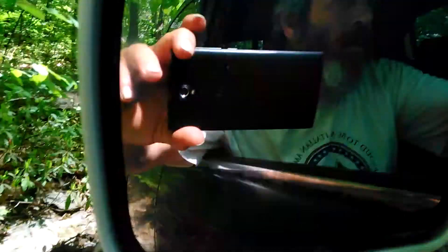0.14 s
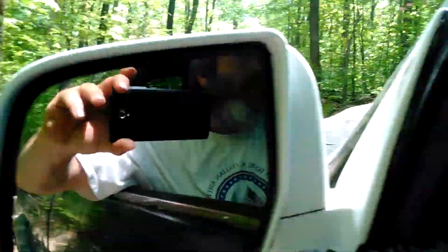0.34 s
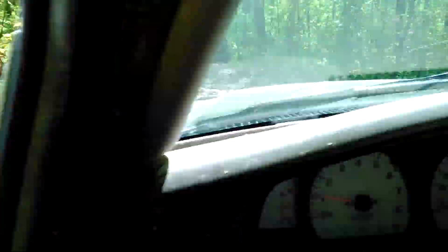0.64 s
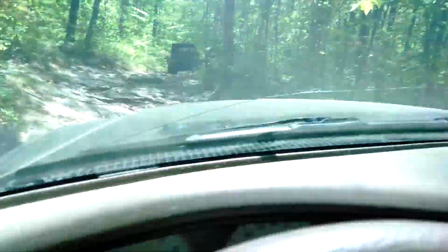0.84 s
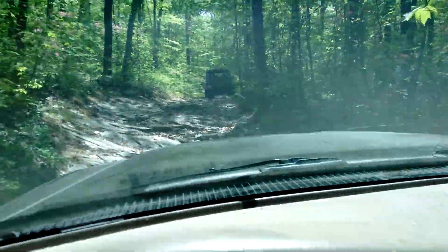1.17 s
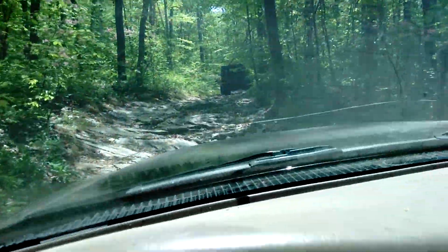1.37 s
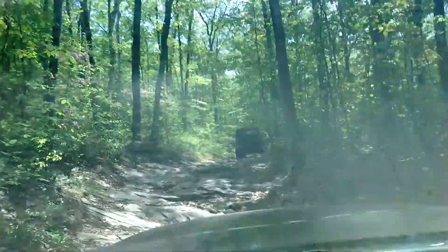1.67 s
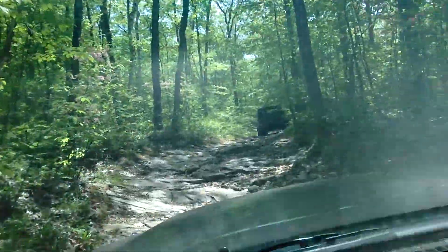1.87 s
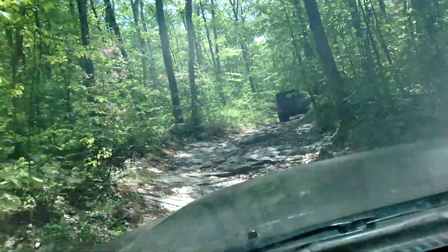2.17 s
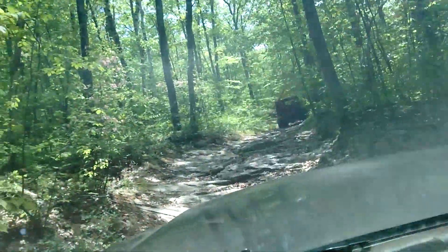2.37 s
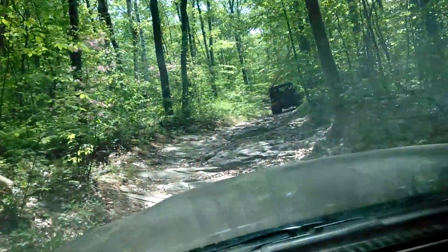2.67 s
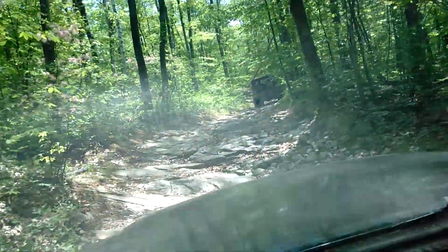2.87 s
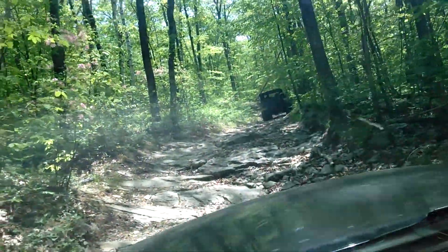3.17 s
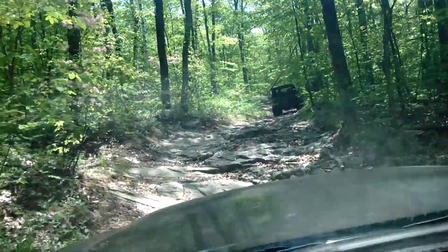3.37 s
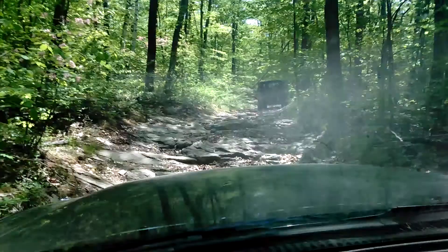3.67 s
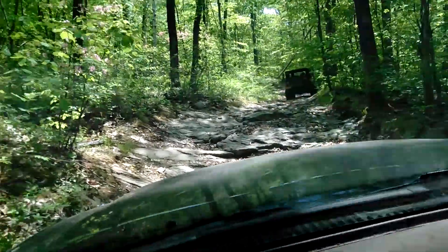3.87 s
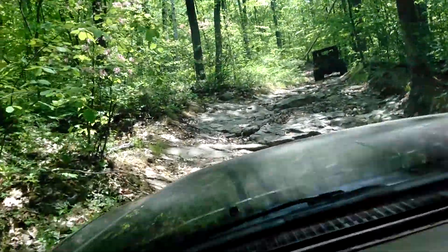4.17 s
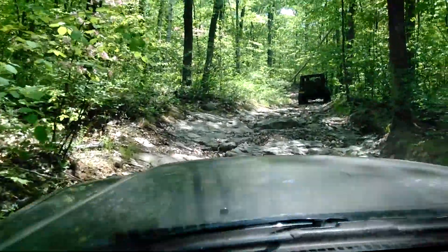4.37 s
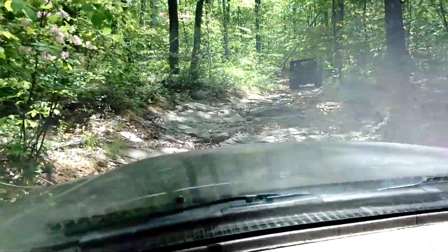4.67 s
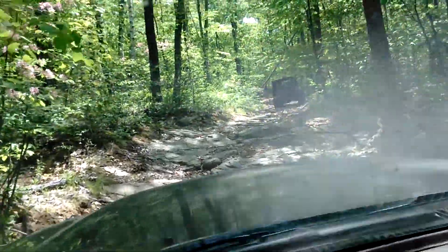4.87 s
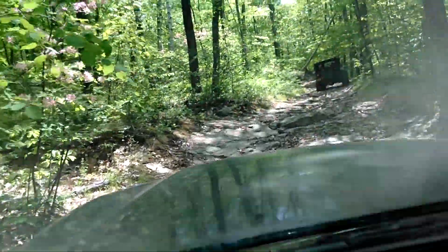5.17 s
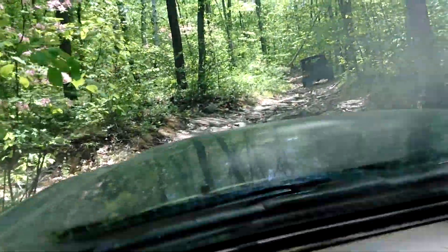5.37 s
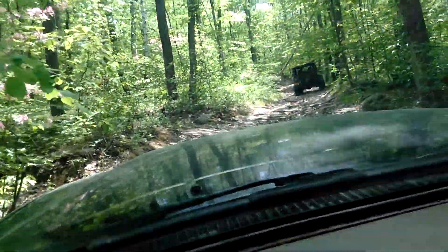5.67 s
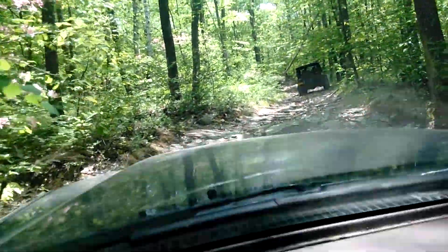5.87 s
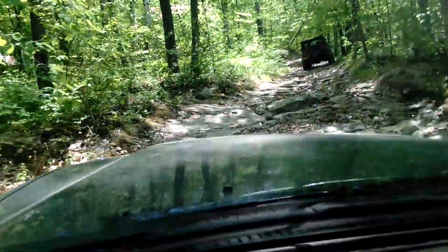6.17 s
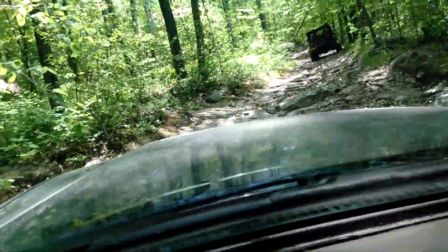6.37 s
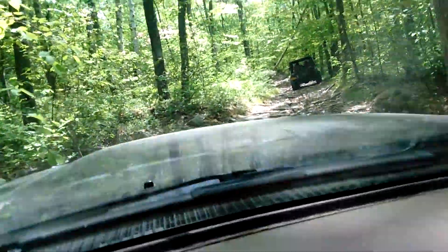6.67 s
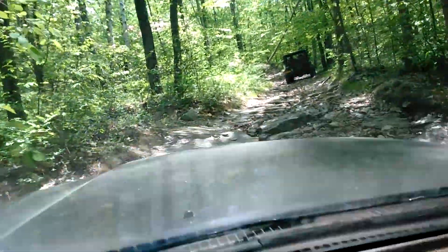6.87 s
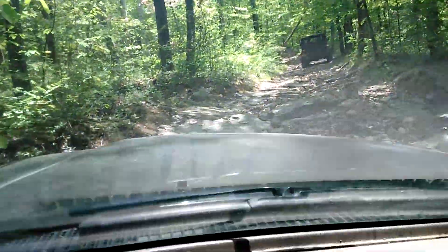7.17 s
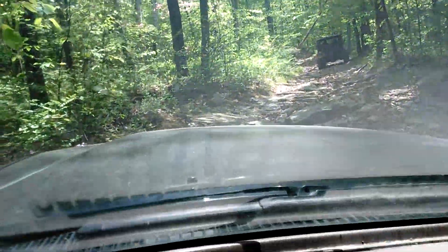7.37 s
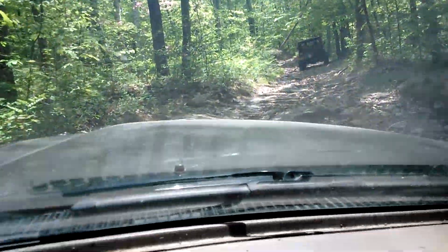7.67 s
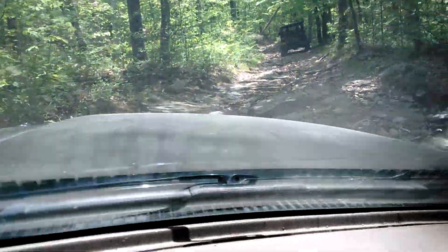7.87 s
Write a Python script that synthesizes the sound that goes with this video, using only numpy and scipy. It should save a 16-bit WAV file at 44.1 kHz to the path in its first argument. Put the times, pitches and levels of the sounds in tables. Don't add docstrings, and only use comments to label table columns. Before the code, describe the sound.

Heard from a phone drawn in through the open window of an off-road vehicle: a grit scrape and hard knock open outside, wind thumps mostly on the left at the window frame, then the cabin closes in. The engine booms in repeated low surges over body rumble and gritty tyre crunch. Frame groans, small ticks and jingles come early; clacks, bright snaps and knocks grow denser later.

```python
import sys
import numpy as np
from scipy import signal
from scipy.fft import rfft, irfft
from scipy.io import wavfile
from scipy.ndimage import uniform_filter1d

SR = 44100
rng = np.random.default_rng(int(sys.argv[2]) if len(sys.argv) > 2 else 0)


def generate_wav(signal):
    frames = np.transpose(np.atleast_2d(signal))
    scaled = np.clip(frames, -1, 1) * 32767
    pcm = np.round(scaled).astype(np.int16)
    wavfile.write(sys.argv[1], SR, pcm)


def boost_factor(decibels):
    exponent = np.asarray(decibels, float) / 20
    return 10 ** exponent


N = 354123

# (time [s], firing rate [Hz], load [dB])
PEDAL_PUSHES = [(0, 36.07, -7.5), (.3, 35.95, -22.5), (.5, 33.02, -17), (.62, 33.32, -8),
                (.794, 41.25, -3.5), (0.927, 47.78, -4.5), (1.12, 47.74, -8), (1.24, 42.5, -10.5),
                (1.4, 36.86, -18), (1.93, 25.76, -26), (2.0, 27.62, -4), (2.116, 31.22, -2),
                (2.269, 32.22, -0.5), (2.4, 35.12, -2.5), (2.52, 35.18, -3.5), (2.7, 27.48, -10),
                (2.8, 24.78, -19), (3.04, 29.5, -27), (3.1, 29.6, -9.5), (3.25, 28.92, -4), (3.4, 35.4, -2),
                (3.644, 46.53, -4), (3.84, 46.66, -12), (3.95, 46.6, -18), (4.09, 42, -14.5),
                (4.22, 37.54, -14.5), (4.31, 39.66, -3.5), (4.44, 45.65, -3.5), (4.536, 49.84, -1.5),
                (4.656, 47.64, -5.5), (4.7, 45.9, -9), (4.89, 37.83, -12.5), (5.0, 35.98, -21),
                (5.12, 35.3, -15), (5.2, 35.27, -2), (5.31, 35.24, 0.5), (5.53, 45.1, -1.5), (5.6, 48, -4),
                (5.72, 45.5, -5.5), (5.82, 39.6, -15), (5.95, 35.4, -21), (6.19, 28.5, -22),
                (6.25, 28.9, 0.5), (6.29, 30.99, -0.5), (6.414, 40.8, -0.5), (6.5, 46.7, -2),
                (6.555, 49.55, -0.5), (6.699, 46.55, -7), (6.92, 43.88, -11.5), (7.02, 41.95, -5.5),
                (7.09, 38.64, -7), (7.2, 30.02, -20), (7.29, 27.01, -17.5), (7.34, 26.43, -6),
                (7.385, 27.59, -1), (7.54, 40.4, -0.5), (7.6, 41, -2.5), (7.71, 39.4, -8),
                (7.87, 35, -19.5), (8.0, 32.4, -40)]
# (frequency [Hz], level [dB])
CABIN_BOOM = [(30, -59), (36, -31.5), (43, -18), (49, -12), (57, -15.5), (70, -17.5), (92, -20), (122, -26),
              (150, -34.5)]
# (level [dB], slope [dB per dB of load])
FIRING_MULTIPLES = [(1.36, 0.96), (-0.7, 1.4), (-5.5, 1.1)]
# (frequency [Hz], width [Hz], level under the booming [dB])
BODY_RESONANCES = [(165, 20, -34), (200, 24, -28.5), (245.5, 21, -23), (297.9, 29, -26)]
FLYWHEEL_S, LEFT_LAG_S = 0.04, 0.0003

# (time [s], half length [s], strength [dB])
JOLTS = [(0.072, 0.62, 8.5), (0.766, 0.13, 11), (1.573, 0.25, 4), (2.292, 0.69, 8.5), (3.005, 0.29, 8),
         (3.386, 0.54, 9), (4.038, 0.24, 6), (4.535, 0.13, 7.5), (4.914, 0.33, 9), (5.512, 0.3, 13.5),
         (6.098, 0.37, 11.5), (6.64, 0.44, 5.5), (7.022, 0.31, 11.5), (7.562, 0.24, 5.5),
         (7.933, 0.17, 12.5)]
# (time [s], half length [s], level [dB])
WINDOW_ROAR = (0.5, 0.17, 8.5)
# (frequency [Hz], level [dB per Hz])
RUMBLE_SPECTRUM = [(79, -46), (135, -8.5), (167, 1.5), (210, -6), (233, -10.5), (282, -10), (618, -22),
                   (670, -22), (1110, -38.5), (1500, -41), (1950, -41), (3300, -120)]
# (frequency [Hz], level [dB per Hz])
BUMP_SPECTRUM = [(30, -45), (48, -5), (75, 0), (110, -2), (140, -18), (300, -60)]
# (frequency [Hz], level [dB per Hz])
CRUNCH_SPECTRUM = [(290, -6), (500, -5), (881, -9), (1020, -8.5), (1270, -15.5), (4710, -24.5),
                   (6330, -34.5), (7500, -32), (9750, -78), (16500, -120)]
# (frequency [Hz], level [dB per Hz])
RUSTLE_SPECTRUM = [(4000, -6.5), (6000, -4), (8000, -1), (11000, 0), (14000, -3.5), (15500, 9)]
# (frequency [Hz], left-right likeness [-1 to 1])
SIDE_LIKENESS = [(60, 1), (180, 0.94), (530, 0.39), (1590, -0.26), (4730, 0.03), (14100, -0.012)]
# (frequency [Hz], left over right [dB])
SIDE_BALANCE = [(60, 1.5), (180, -2), (530, 0.5), (1590, 2.5), (4730, 6), (14100, -7)]
# (frequency [Hz], width [Hz], level [dB])
PORTS = [(11800, 2600, .7), (10300, 2600, -.7)]
RUMBLE_DB, RUMBLE_PER_LOAD, RUMBLE_LAG_S, IDLE_DB = -33.5, 0.3, 0.066, -15
RUMBLE_PER_HZ, RUMBLE_PER_JOLT, RUMBLE_OUTSIDE_DB = 0.055, 0.12, -4.5
CRUNCH_DB, CRUNCH_PER_JOLT, ROUGHER_DB_PER_S, OUTSIDE_DB = -52.5, 0.53, 0.5167, -44
RUSTLE_DB = -52.5

# (time [s], half length [s], frequency [Hz], width [Hz], level [dB])
RASPS = [
    (.1, 0.36, 700, 500, -48),
    (.3, 0.27, 400, 250, -48),
    (1.35, 0.21, 1890, 1200, -59.5),
    (1.85, 0.35, 2300, 800, -60),
    (2.156, 0.19, 4300, 1200, -57.5),
    (2.448, .2, 4300, 1500, -67),
    (6.835, 0.041, 2201, 2485, -46),
    (7.945, 0.041, 3200, 2510, -57),
]

# (time [s], peak [dB], ring [Hz], length [s], left over right [dB])
TICKS = [(0.066, -35, 1800, 0.024, -8), (0.519, -31.5, 1970, 0.005, -8), (1.1261, -39, 1180, 0.018, 6),
         (2.3234, -41.5, 1698, 0.011, 11), (2.6653, -37.5, 1680, 0.008, 14), (2.838, -43, 1770, 0.023, 11),
         (3.742, -34.5, 1720, 0.01, 15), (3.8184, -38, 1810, 0.0077, 13), (4.7407, -30.5, 1557, 0.0042, 17),
         (4.8988, -41, 2300, 0.011, 9), (6.2627, -37, 2020, 0.006, 8), (6.8633, -29, 2520, 0.011, 16.5),
         (7.0858, -35, 2065, 0.014, 2), (7.899, -22.5, 2100, 0.006, 9)]
# (time [s], peak [dB], ring [Hz], length [s], left over right [dB])
CHINKS = [
    (0.0728, -41, 3550, 0.0053, -5),
    (0.6374, -52, 3920, 0.0027, 15),
    (2.049, -46.5, 4500, 0.012, 12),
    (2.9413, -48, 4480, 0.014, 21.5),
    (3.5665, -47, 4550, 0.011, 14),
    (4.849, -45.5, 4340, 0.0059, 16),
    (5.2844, -47, 4196, 0.0079, 14),
    (6.2122, -45, 4400, 0.004, 13),
]
# (time [s], peak [dB], ring [Hz], length [s], left over right [dB])
KNOCKS = [
    (0.108, -13, 620, 0.0055, -4),
    (2.087, -51, 516, 0.06, 11),
    (2.189, -38, 534, 0.02, 9),
    (2.239, -30.5, 470, 0.028, 6),
    (5.492, -26, 746, 0.018, 9),
    (5.517, -40, 770, 0.011, 1),
    (5.809, -22.5, 435.6, 0.013, 2),
    (5.878, -21, 730, 0.0082, 2),
    (6.033, -24.5, 697, 0.0078, -6),
    (3.75, -33, 790, 0.012, 5),
]
# (time [s], peak [dB], ring [Hz], length [s], left over right [dB])
TAPS = [
    (.636, -33, 2440, 0.0037, 15),
    (4.022, -32, 2200, 0.017, 7),
    (4.927, -26, 4890, 0.006, 8),
    (7.278, -35, 6400, 0.029, -5),
    (6.862, -24, 730, 0.015, 0),
    (8.6, -29, 2600, .008, 5),
    (6.812, -31, 1600, .006, 5),
    (6.865, -29, 4000, .012, 10),
]
# (time [s], peak [dB], ring [Hz], length [s], left over right [dB])
GROANS = [
    (2.112, -30, 293.3, 0.023, 3),
    (2.232, -26, 338, 0.017, 4),
    (2.225, -28, 567, 0.023, 4),
    (2.272, -31, 400, 0.018, 5),
    (2.385, -37, 568, .02, 3),
    (5.46, -35.5, 790, 0.027, 4),
]

# (start [s], end [s], frequency [Hz], level [dB])
BELT_SQUEAL = (.11, .34, 1390, -50)

# (frequency [Hz], level [dB])
DULL_TRIM = [(500, 9.5), (900, 6), (2000, -0.5), (4000, -6.5), (6000, -6), (9000, -11)]
# (time [s], peak [dB], dull over bright part [dB], length [s], left over right [dB])
RUBS = [(0.148, -35.5, 0, 0.06, -9), (0.6918, -33.5, -16, 0.027, -10), (1.3736, -43, -18, 0.063, 16.5),
        (1.503, -35.5, -19, 0.038, 18.5), (1.5618, -38, -26, 0.054, 29), (1.6318, -37.5, -21, 0.036, 17),
        (4.0312, -41, 9.5, 0.017, 0), (4.4685, -35, -26, 0.045, -3), (4.7645, -25, -1, 0.01, 1),
        (4.776, -23.5, -7.5, 0.022, 4), (5.492, -38.5, 2.5, 0.05, 4), (6.0055, -28.5, -3, 0.019, 2),
        (6.0696, -31.5, -2, 0.029, 7), (6.2334, -27.5, -39, 0.023, 2), (7.278, -30.5, -19, 0.045, 0),
        (7.479, -33.5, -24, 0.041, -5), (7.9254, -32, -1.5, 0.051, 0), (4.007, -33, -5, 0.018, 0),
        (6.82, -34, 0, .035, -5)]
# (time [s], peak [dB], dull over bright part [dB], length [s], left over right [dB])
SNAPS = [(0.7502, -25.5, -21, 0.004, -5), (1.356, -36.5, -26, 0.0062, 20.0),
         (1.5993, -14.5, -56, 0.0026, -4.5), (1.836, -39.5, -6, 0.004, -12),
         (1.9051, -28.5, -21, 0.0014, 17), (1.9849, -43, -4, 0.0035, 15), (2.168, -31, -30, 0.0014, 3),
         (2.8742, -38, -10, 0.0044, 8), (5.29, -39.5, 2.5, 0.004, -6), (6.2087, -34, -17, 0.0038, -6),
         (6.2931, -36.5, -10, 0.003, 6), (7.0734, -22.5, -4, 0.0039, -3), (7.5708, -26.5, -6, 0.0063, -2),
         (5.9215, -39, 4.5, 0.0037, 8), (4.713, -40, -15, 0.0066, 0), (3.934, -40, -15, 0.0029, 0),
         (6.884, -38.5, -15, 0.0058, 2)]
# (time [s], peak [dB], dull over bright part [dB], length [s], left over right [dB])
CLACKS = [(3.746, -37, 2.5, 0.021, 2), (4.0215, -20.5, -6, 0.014, 3), (4.739, -27.5, 3.5, 0.01, 4),
          (4.9235, -13, -17, 0.0042, 0), (5.4924, -25, -4, 0.01, 2), (5.877, -25.5, -4, 0.015, 6),
          (6.0298, -24.5, 3.5, 0.0093, 6), (6.1793, -27.5, -8, 0.015, 8), (6.6427, -34, -1.5, 0.025, 1.5),
          (6.8114, -29.5, 6, 0.011, 4), (6.861, -36, 14, 0.014, 9.5), (7.855, -34, 4, 0.014, 4.5),
          (7.8968, -36.5, 9, 0.008, 7)]
# (time [s], peak [dB], dull over bright part [dB], length [s], left over right [dB])
BOUNCES = [
    (6.149, -29, -11, 0.0095, 7),
    (6.992, -31.5, -7.5, 0.017, 1),
    (6.159, -10, -33, .0055, 6),
    (6.182, -24, -20, .003, 5),
    (7.0153, -8, -11.5, 0.0021, 5),
    (7.0218, -18, -14.5, 0.0017, -12),
    (7.027, -22, -23, 0.0017, -7),
    (7.0353, -24, -19, 0.002, 4),
    (7.041, -34, -20, .0022, 0),
]

# (time [s], peak [dB], part above 700 Hz against the peak [dB], left over right [dB])
BUFFETS = [(0.434, -25, -25, 15), (0.477, -18, -31, 18.0), (0.509, -23, -40, 16.0), (0.543, -18, -23, 23.0),
           (0.557, -17.5, -14, 19), (0.573, -17.5, -28, 17.0), (0.592, -10, -36, 18.5),
           (0.627, -12, -10, 26.0), (0.634, -17, -13, 25.0), (0.643, -20.5, -30, 18), (0.673, -19, -30, 16),
           (0.687, -11.5, -7.5, 17.0), (0.696, -11, -5, 16.0), (0.709, -15.5, -7, 15),
           (0.524, -22.5, -13, 15), (0.534, -23, -16, 17), (0.583, -20.5, -18, 17), (0.68, -21, -17, 17),
           (0.599, -20, -15, 18), (0.719, -25, -18, 15)]

# (time [s], peak [dB], ring [Hz], length [s], left over right [dB])
SINGS = [
    (4.026, -20, 11800, 0.012, 6),
    (4.777, -23.5, 11800, 0.019, 7),
    (4.768, -36.5, 6900, .022, 2),
    (6.007, -33, 9500, .021, 2),
    (6.006, -28, 13100, .012, 6),
    (6.1585, -10, 11800, 0.0069, 11),
    (6.171, -24, 11800, .004, 8),
]


def evened(x):
    return x / np.sqrt(np.mean(x ** 2) + 1e-20)


def peaked(x):
    return x / abs(x).max(1, keepdims=True)


def read(points, hz):
    f, value = np.transpose(points)
    return np.interp(np.log(hz + 1), np.log(f + 1), value)


def colour(x, points):
    hz = np.fft.rfftfreq(x.shape[-1], 1 / SR)
    return irfft(rfft(x) * boost_factor(read(points, hz)), x.shape[-1])


def drift(seconds):
    size = max(int(seconds * SR), 2)
    return evened(uniform_filter1d(uniform_filter1d(rng.standard_normal(N), size), size))


def hump(t, s, half):
    return np.cos(np.pi / 2 * np.clip((t - s) / half, -1, 1)) ** 2


def resonate(x, hz, width):
    r = np.exp(-np.pi * width / SR)
    return 2 * signal.lfilter([1 - r], [1, -r * np.exp(2j * np.pi * hz / SR)], x).real


def resonate_twice(x, hz, width):
    return resonate(resonate(x, hz, width), hz, width)


def ports(x):
    return np.array([boost_factor(db) * (resonate(side, hz, width) + 0.092 * side)
                     for side, (hz, width, db) in zip(x, PORTS)])


def add(mix, s, sound, left_db):
    part = mix[:, round(s * SR):][:, :sound.shape[1]]
    sides = boost_factor(np.array([[.5], [-.5]]) * np.clip(left_db, -15, 15))
    part += (sound * sides)[:, :part.shape[1]]


def burst(length, rise, same, drop):
    t = np.arange(4096) / SR
    shared, left, right = rng.standard_normal((3, 4096))
    same, length = np.clip(same, 0, 1), np.clip(length, .0015, .05)
    puff = same * shared + np.sqrt(1 - same ** 2) * np.array([left, right])
    return puff, (1 - np.exp(-t / rise)) * np.exp(-(t / length) ** drop)


def noise(points, size, patchy_db, flicker_db):
    frames, hz = 4 * N // size + 5, np.fft.rfftfreq(size, 1 / SR)
    a, b, c, d, patches = rng.standard_normal((frames, len(hz), 5)).T
    patches = evened(uniform_filter1d(uniform_filter1d(patches, 6, 0), 8, 1))
    flicker = evened(uniform_filter1d(rng.standard_normal(frames), 10))
    same = np.clip(read(SIDE_LIKENESS, hz), -1, 1)[:, None]
    left = a + 1j * b
    right = same * left + np.sqrt(1 - same ** 2) * (c + 1j * d)
    z = np.array([left, right])
    z *= boost_factor(read(points, hz)[:, None] + patchy_db * patches + flicker_db * flicker)
    z *= boost_factor(np.array([.5, -.5])[:, None, None] * read(SIDE_BALANCE, hz)[:, None])
    return evened(signal.istft(z, nperseg=size, noverlap=3 * size // 4)[1][:, :N])


def pedal(t):
    s, hz, load_db = np.transpose(PEDAL_PUSHES)
    size = int(FLYWHEEL_S * SR)
    return [uniform_filter1d(np.interp(t, s, v), size, mode="nearest") for v in (hz, load_db)]


def body_lift(hz):
    return sum(boost_factor(db) / (1 + ((hz - body_hz) / width) ** 2) for body_hz, width, db in BODY_RESONANCES)


def engine():
    hz, load_db = pedal(np.arange(N) / SR)
    levels = [boost_factor(slope * load_db + db + read(CABIN_BOOM, (k + 1) * hz))
              for k, (db, slope) in enumerate(FIRING_MULTIPLES)]
    uneven_hz = hz * (1 + 0.0051 * drift(0.029))
    turn = 2 * np.pi * (np.cumsum(uneven_hz) / SR - hz * np.array([[LEFT_LAG_S], [0]]))
    low = 0
    for k, level in enumerate(levels):
        low = low + level * boost_factor(5 + 1.68 * drift(0.019)) * np.cos((k + 1) * turn - 1.67 * k)
    high = 0
    for k in range(4, 12):
        order = np.cos(k * turn + 0.43 * drift(0.052))
        high = high + boost_factor(2.77 * drift(0.021)) * order * body_lift(k * hz)
    return low * boost_factor([[.6], [-.6]]) + (levels[0] + 0.36 * levels[1]) * high * boost_factor([[1.5], [-1.5]])


def road():
    t = np.arange(N) / SR
    hz, load_db = pedal(t)
    jolt_db = sum(db * hump(t, s, half) for s, half, db in JOLTS)
    keep = np.exp(-1 / (RUMBLE_LAG_S * SR))
    load_db = IDLE_DB + signal.lfilter([1 - keep], [1, -keep], load_db - IDLE_DB)

    window_s, window_half_s, window_db = WINDOW_ROAR
    rumble_db = RUMBLE_DB + RUMBLE_PER_LOAD * load_db + window_db * hump(t, window_s, window_half_s)
    rumble_db = rumble_db + RUMBLE_PER_HZ * (hz - 38) + RUMBLE_PER_JOLT * jolt_db
    rumble_db = rumble_db + RUMBLE_OUTSIDE_DB * (t < window_s)
    throb = 1 + 0.28 * np.cos(2 * np.pi * np.cumsum(hz) / SR)
    rumble = boost_factor(rumble_db) * throb * noise(RUMBLE_SPECTRUM, size=2048, patchy_db=1.5, flicker_db=1.5)
    bumps_db = -34 + 0.63 * (rumble_db + 38.5)
    bumps = boost_factor(bumps_db) * noise(BUMP_SPECTRUM, size=2048, patchy_db=2, flicker_db=2)

    crunch = noise(CRUNCH_SPECTRUM, size=512, patchy_db=2.0, flicker_db=1.4)
    outside = np.clip((.8 - t) / .15, 0, 1)
    crunch = (1 - outside) * crunch + outside * evened(resonate_twice(crunch, 1440, 2200))
    inside_db = CRUNCH_DB + CRUNCH_PER_JOLT * jolt_db + ROUGHER_DB_PER_S * t + 0.085 * (load_db + 8)
    crunch = boost_factor(inside_db + outside * (OUTSIDE_DB - inside_db)) * crunch

    rustle = evened(ports(noise(RUSTLE_SPECTRUM, size=256, patchy_db=2.5, flicker_db=-1.0)))
    return rumble + bumps + crunch + boost_factor(RUSTLE_DB + jolt_db) * rustle


def rasps():
    t = np.arange(N) / SR
    grit = rng.standard_normal((2, N)) * boost_factor(3 * drift(.004))
    return sum(boost_factor(db) * hump(t, s, half) * evened(resonate_twice(grit, hz, width))
               for s, half, hz, width, db in RASPS)


def knocks(rows, share, wide):
    out = np.zeros((2, N))
    for s, db, hz, length, left_db in rows:
        puff, fall = burst(length, 0.0005, 0.87, 1.24)
        ring = peaked(resonate_twice(fall * puff, hz, share * hz))
        tap = peaked(resonate_twice(fall * puff, 1.3 * hz, .8 * hz))
        add(out, s, boost_factor(db - 1.0) * peaked(ring + wide * tap), left_db)
    return out


def cabin(x):
    taps = np.zeros((2, 8000))
    at = np.arange(100, 7960, 20) + rng.integers(0, 20, (2, 393))
    np.put_along_axis(taps, at, rng.choice([-1., 1.], at.shape), 1)
    taps *= boost_factor(-60 * np.arange(8000) / SR / .12)
    return signal.fftconvolve(x, taps / np.linalg.norm(taps[0]), axes=1)[:, :N]


def squeal():
    start, end, hz, db = BELT_SQUEAL
    hiss = rng.standard_normal((2, round((end - start) * SR)))
    whistle = evened(resonate_twice(hiss, hz, 70))
    out = np.zeros((2, N))
    add(out, start, boost_factor(db) * whistle * signal.windows.tukey(whistle.shape[1], .4), 3)
    return out


def clacks(rows, rise, drop, lumpy_db):
    out = np.zeros((2, N))
    for s, db, dull_db, length, left_db in rows:
        puff, fall = burst(length, rise, 0.49, drop)
        rebounds = evened(uniform_filter1d(rng.standard_normal(4096), 60))
        fall = fall * boost_factor(lumpy_db * rebounds)
        ring = np.array([resonate(side, hz * (1 + 0.045 * rng.standard_normal()), 860)
                         for side, (hz, _, _) in zip(puff, PORTS)])
        bright = evened(ports(ports(colour(puff, RUSTLE_SPECTRUM)))) + .8 * evened(ports(ring))
        modes = sum(resonate(puff, f, .3 * f) for f in 900 * 5 ** rng.random(5))
        dull = evened(colour(puff, DULL_TRIM)) + evened(modes)
        hit = peaked(fall * bright) + boost_factor(dull_db) * peaked(fall * dull)
        add(out, s, boost_factor(db + 3.0) * hit, left_db)
    return out


def buffets():
    low_points = [(60, 1.5), (150, -5.5), (600, -17.0), (1000, -32), (3000, -85)]  # Hz, dB
    top_points = [(400, -22), (750, 14.5), (1500, 2), (2500, -18), (4400, -49), (5500, -70)]
    out = np.zeros((2, N))
    for s, db, top_db, left_db in BUFFETS:
        puff, fall = burst(.008, .0015, .7, 1.8)
        low = peaked(fall * colour(puff, low_points))
        top = peaked(fall ** 2 * colour(puff, top_points))
        thump = low + boost_factor(np.maximum(top_db, -20) - 3.5) * top
        add(out, s, boost_factor(np.minimum(db + 3.0, -11)) * thump, left_db)
    return out


def sings():
    out = np.zeros((2, N))
    for s, db, hz, length, left_db in SINGS:
        puff, fall = burst(length, .001, .8, 4.6)
        add(out, s, boost_factor(db) * peaked(fall * resonate_twice(puff, hz, .04 * hz)), left_db)
    return out


def scene():
    drive = engine() + road() + rasps()
    bits = knocks(TICKS, share=.2, wide=.3) + knocks(CHINKS, share=.12, wide=.2)
    hits = knocks(KNOCKS, share=.4, wide=.5) + clacks(CLACKS, rise=.0005, drop=1.0, lumpy_db=1.5)
    tail = boost_factor(-14) * cabin(hits)
    near = clacks(RUBS, rise=.003, drop=3, lumpy_db=1.8)
    near = near + clacks(SNAPS + BOUNCES, rise=.0003, drop=1.2, lumpy_db=1)
    frame = knocks(TAPS, share=.42, wide=.2) + knocks(GROANS, share=.1, wide=.087)
    return drive + bits + hits + tail + squeal() + near + buffets() + frame + sings()


def low_pass(x):
    return signal.sosfilt(signal.butter(12, 14710, fs=SR, output="sos"), x)


def record(dry):
    bass_cut = signal.butter(2, 28, "highpass", fs=SR, output="sos")
    cut = signal.sosfilt(bass_cut, dry)
    band = signal.firwin(127, 14250, window=("kaiser", 5), fs=SR)
    mix = signal.oaconvolve(cut, band[None], "same")
    return low_pass(mix)


dry = scene()
out = record(dry)
generate_wav(out)
```